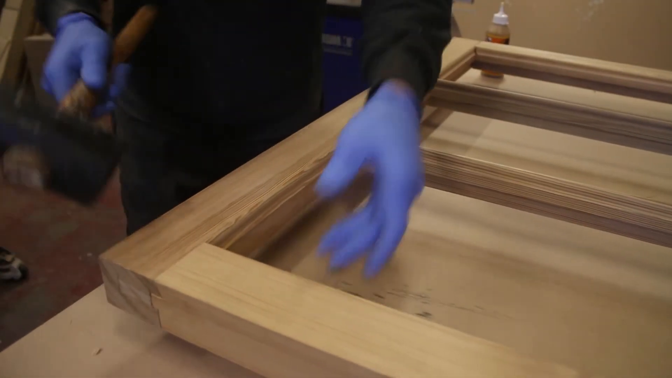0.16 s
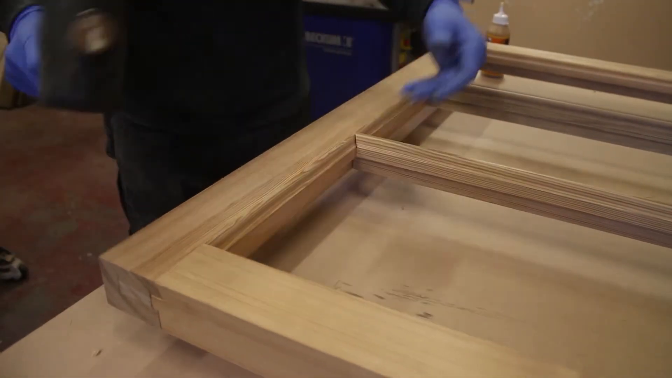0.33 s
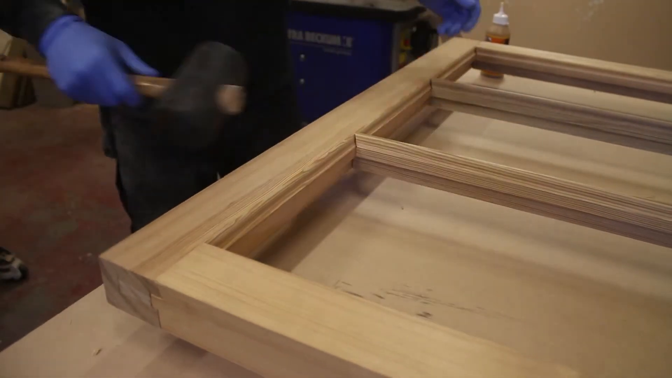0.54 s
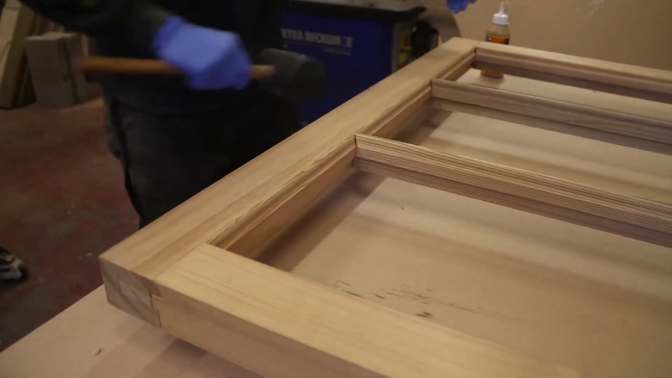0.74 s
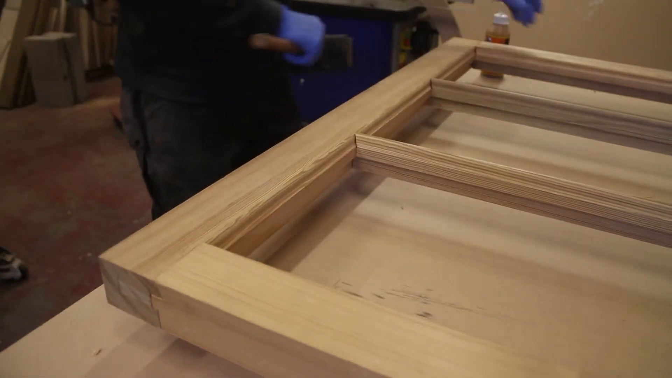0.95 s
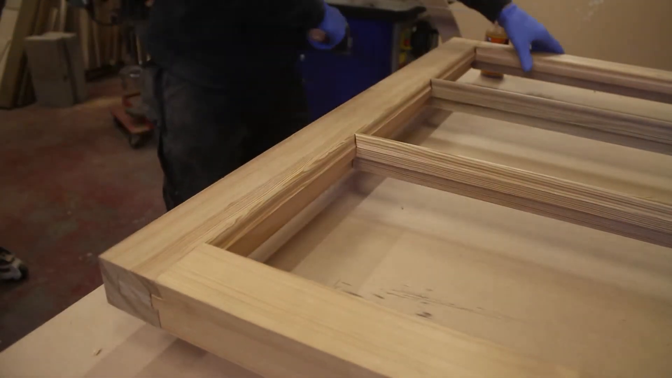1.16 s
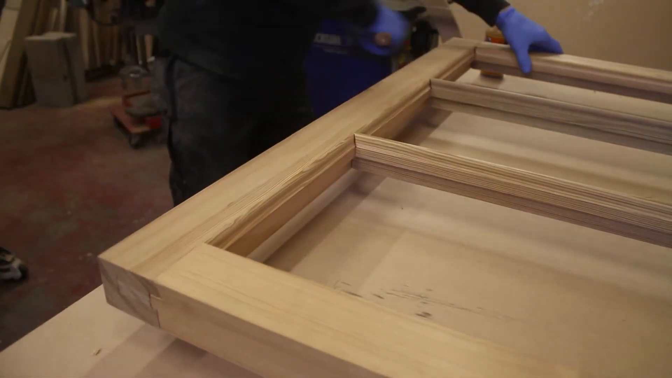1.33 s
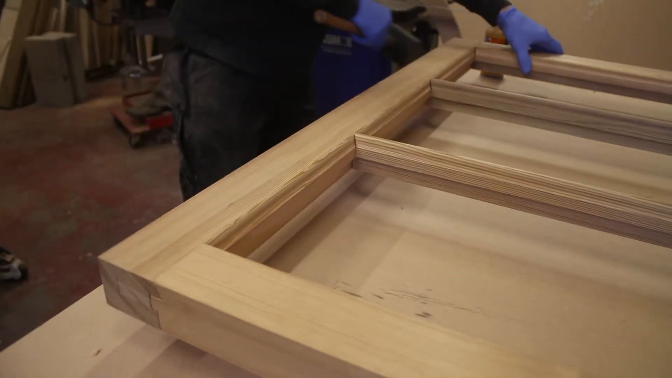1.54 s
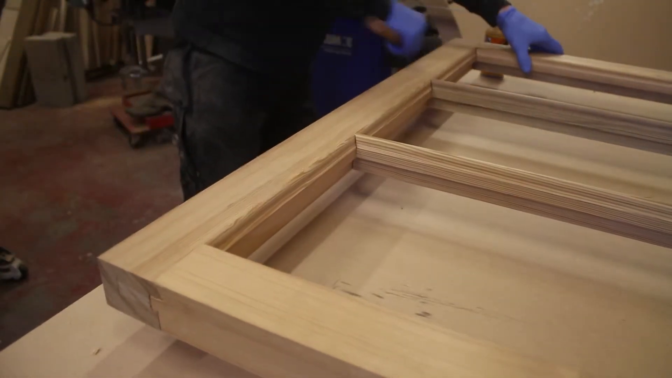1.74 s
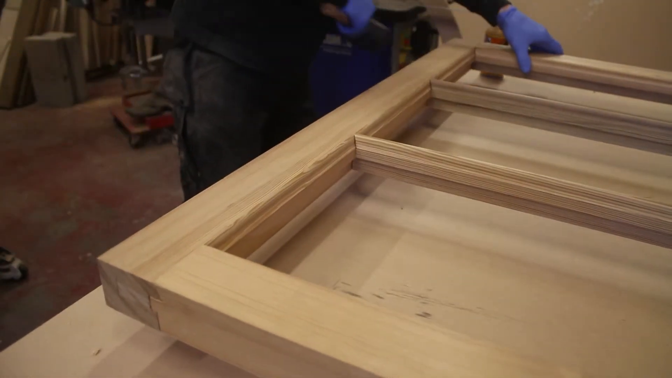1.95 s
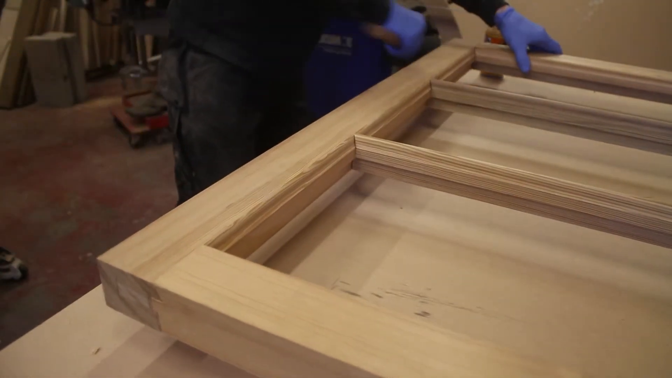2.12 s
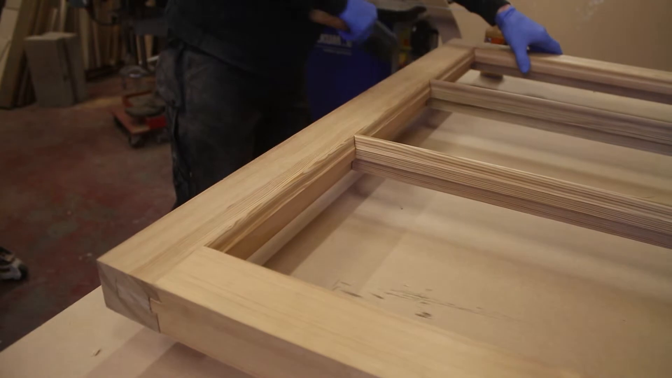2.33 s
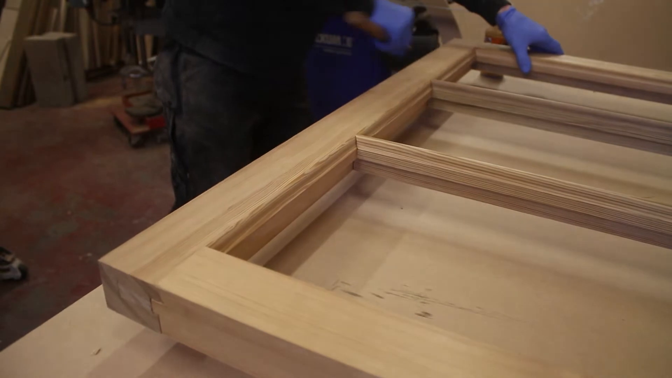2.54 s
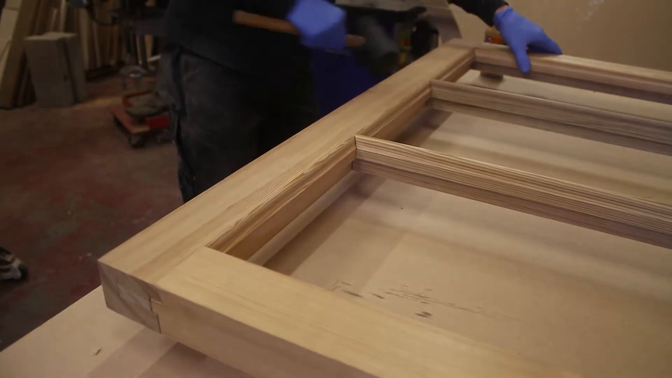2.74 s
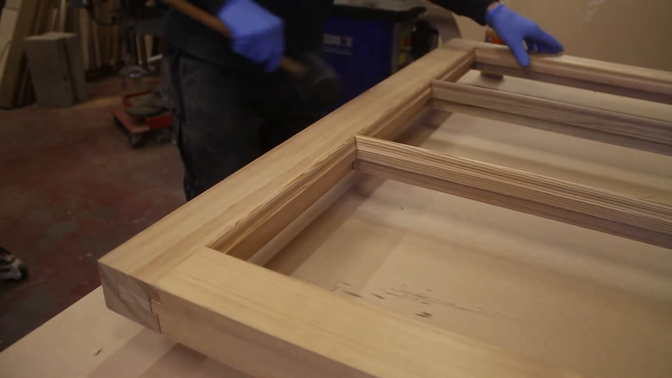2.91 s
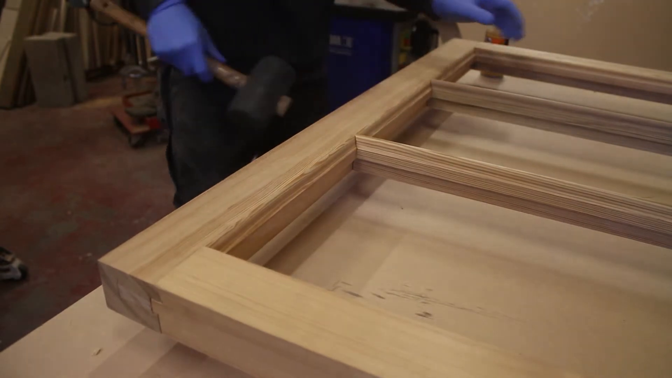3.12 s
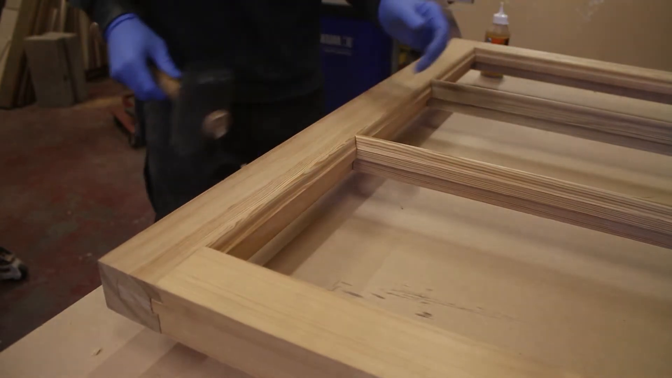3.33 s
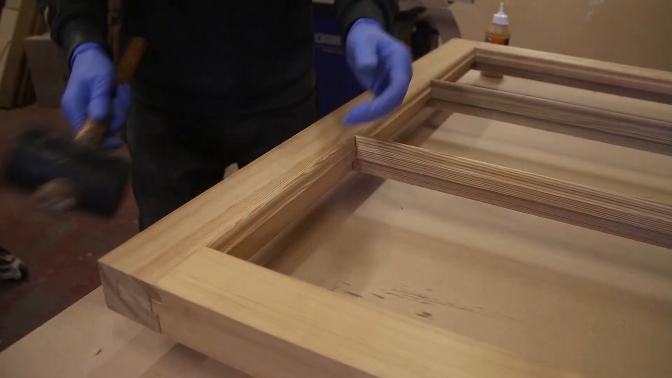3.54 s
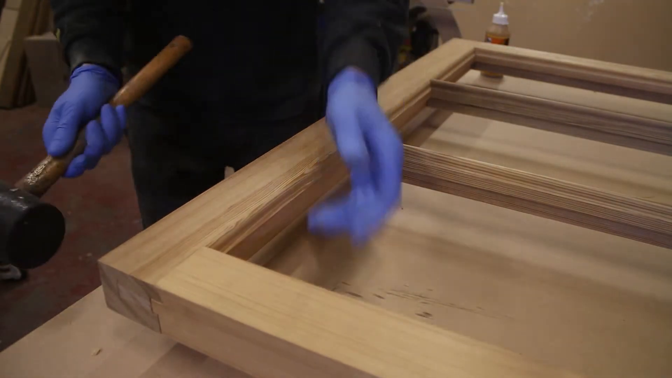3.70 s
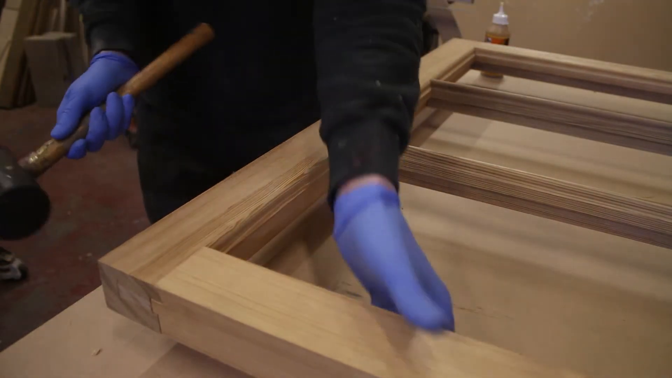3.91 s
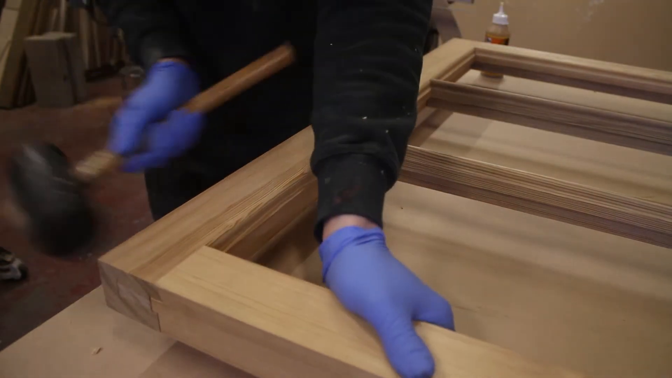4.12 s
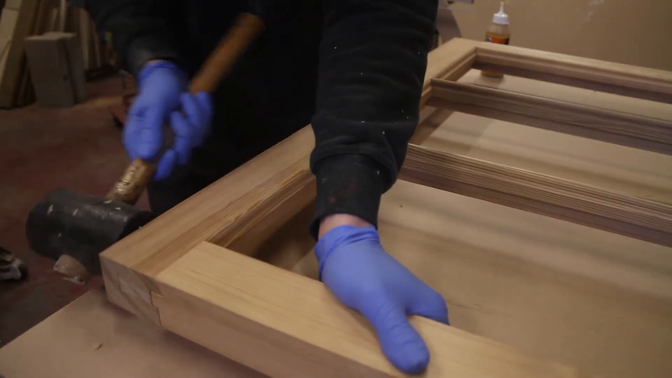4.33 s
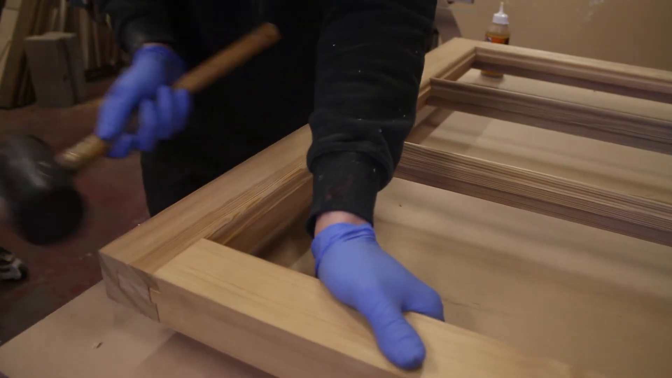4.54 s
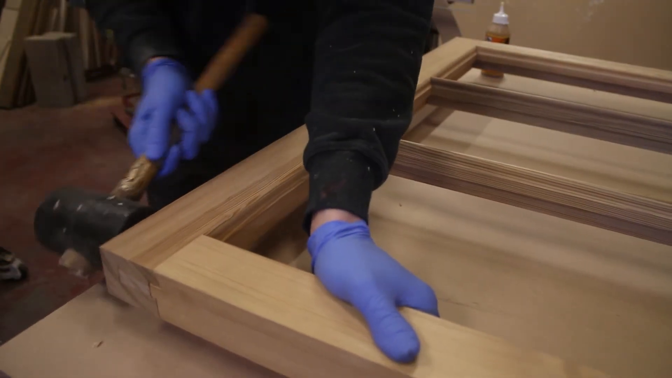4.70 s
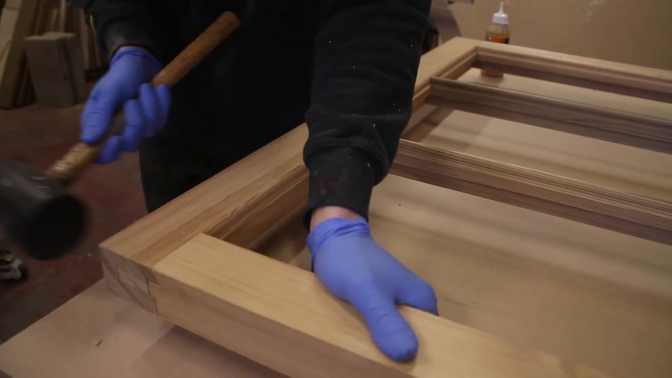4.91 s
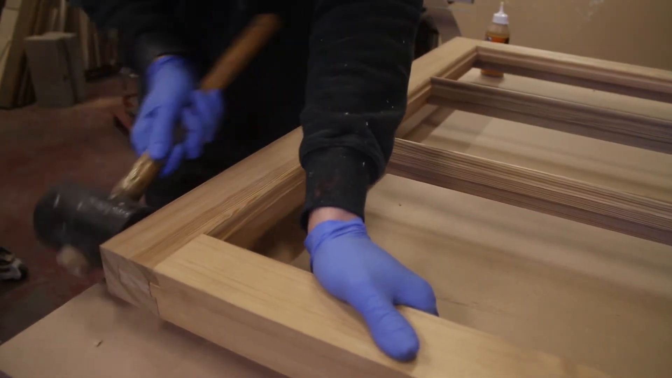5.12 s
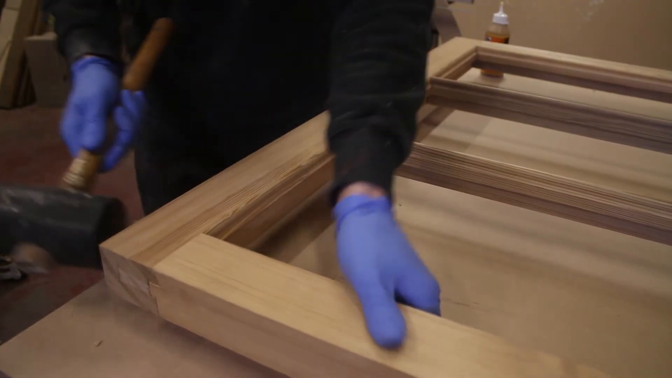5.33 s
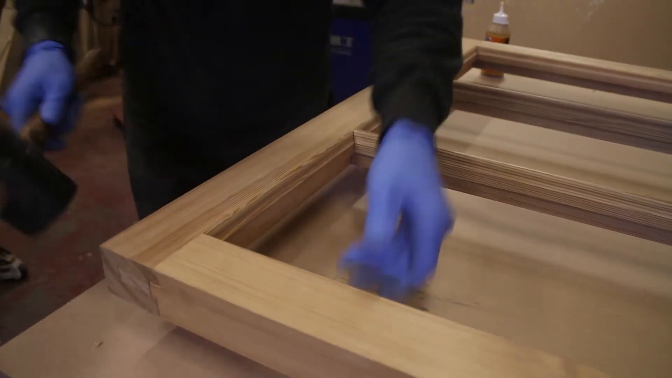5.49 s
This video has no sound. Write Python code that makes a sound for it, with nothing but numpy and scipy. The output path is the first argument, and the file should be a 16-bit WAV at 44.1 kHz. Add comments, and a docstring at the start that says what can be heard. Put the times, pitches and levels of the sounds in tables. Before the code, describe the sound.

A rubber mallet knocks the joints of a wooden frame together: four loud, evenly paced blows, a pause of under two seconds, then three slightly slower ones nearer the microphone. The hits vary between thump and clack, slightly distorted, with the workshop's echo hanging on after each. In between come quiet sleeve and glove rustles, a dull bump and a shoe scuff, over a steady low hum.

```python
"""First comes the fading echo of a mallet blow in a workshop, over a mains hum. A rubber mallet is
driving home the glued joints of a wooden frame on a bench: four blows at the far end, then three at
the near corner, each making the wood ring. Between blows, sleeves and gloves rustle, a shoe scuffs and
a hand bumps the frame. Each blow overloads the microphone, so a limiter (an automatic volume control)
turns the sound down, then back up about as fast as the echo dies, which makes the echo hang on."""
import sys
import numpy as np
from scipy import signal
from scipy.io import wavfile
from scipy.ndimage import minimum_filter1d

SR = 44100
rng = np.random.default_rng(int(sys.argv[2]) if len(sys.argv) > 2 else 0)


def file_out(sig):
    """Save sig as 16-bit WAV at sys.argv[1]."""
    # one column per channel
    cols = np.atleast_2d(sig).T
    # limit, then scale
    lim = np.clip(cols, -1, 1)
    pcm = np.round(lim * 32767).astype(np.int16)
    wavfile.write(sys.argv[1], SR, pcm)


N = 245195
TIME = np.arange(N) / SR

# tone of the workshop's steady air noise: f/Hz, relative level/dB
AIR_COLOUR = [(15, -45), (25, -24), (101, -10.5), (129, -16), (204, -4), (267, -33), (305, -16), (368, -41),
              (399, -1), (433, -22), (495, -20), (2060, -25.5), (2300, -29), (15500, -43.5)]
# tones of the mains hum: f/Hz, level/dB
HUM_TONES = [(50, -66), (100, -57.5), (200, -62.5), (300, -61), (400, -60.5)]
# how much left and right differ in sound that comes from all around: f/Hz, side minus mid level/dB
STEREO_WIDTH = [(60, -5.5), (200, -13), (380, -15.5), (700, -10.5), (1290, -9), (2380, -5), (4400, -5.5),
                (8000, 0), (15000, -0.5)]
# how long the room's echo takes to fade by 60 dB: f/Hz, t/s
ECHO_FADE = [(100, 0.79), (260, 0.57), (700, 0.66), (1150, 0.6357), (1840, 0.615), (4850, 0.6044),
             (8000, .5), (13000, 0.174)]
# tone of the echo: f/Hz, relative level/dB
ECHO_COLOUR = [(50, -9), (150, -1), (350, 0), (700, 0), (1200, 5), (1700, -7.5), (2500, -0.5), (5000, 0.5),
               (9000, 8.5), (12000, 9.5), (16000, -8)]

# rubbing strokes of shoe, sleeve and glove: peak t/s, fade t/s, level/dB
SHOE_STROKES = [(3.764, 0.093, -32)]
SLEEVE_STROKES = [(0.13, 0.24, -44.5), (1.01, 0.095, -50.5), (1.27, 0.062, -47.5), (1.38, 0.13, -45),
                  (3.37, 0.36, -56), (4.093, 0.033, -43.5)]
GLOVE_STROKES = [(0.36, .04, -61), (0.47, 0.064, -58), (2.99, 0.06, -49.5), (3.37, 0.04, -65),
                 (4.033, 0.021, -51), (5.43, 0.052, -46.5)]
# tone of each kind of rubbing: f/Hz, relative level/dB
SHOE_TONE = [(88, -52), (150, -7), (243, -3.5), (306, 2), (425, -2), (477, -9), (636, 0.5), (972, -13),
             (1490, 0), (1770, -1), (2230, -4), (2650, -2), (2920, 0), (15000, -39)]
SLEEVE_TONE = [(200, 1), (900, -1.5), (2000, -1), (3500, 0), (6000, -7), (10000, -20), (15000, -44)]
GLOVE_TONE = [(1000, -2), (3500, -4), (6000, -2), (9000, 3), (12000, -16), (15000, -36)]
# low shudders as the glove grips a rail of the frame: peak t/s, half length t/s, f/Hz, level/dB
GRIP_JUDDERS = [(4.13, 0.021, 165, -40), (4.25, 0.012, 160, -40)]

# modes (natural tones) of frame and bench: f/Hz, width f/Hz, far-end level/dB, near-corner level/dB
WOOD_MODES = [(74.4, 30.5, -3.5, -6.5), (105, 31, -3, -9), (173, 53.5, -2.5, -2.5), (236, 16, 3, 0),
              (271, 43, -2.5, -1), (473, 135.3, 0, -0.5), (524, 29, 3.5, 4), (596, 41, -2.5, -1.5),
              (712, 50, 2, 2), (787.5, 79, -1, -2), (1140, 105, -3.5, -2), (1266, 70.5, -4, -1.5),
              (1420, 218, -6.5, -8), (1871, 158, -4.5, -5), (2304, 386, -10, -8), (3033, 447, -12.5, -9.5),
              (3323, 532, -15, -11), (4210, 1640, -24, -19), (6380, 1670, -26, -23),
              (7520, 4800, -31.5, -27.5), (13200, 25000, -43, -36)]
# mallet blows, the first already fading at the start; each struck spot favours one resonance:
# t/s, force level/dB, end of the frame, joint's give (0 tight, 1 loose), favoured f/Hz, its boost/dB
MALLET_BLOWS = [(-0.135, 50.5, "near", 0.4, 1075, 8), (1.4483, 46.5, "far", 0.77, 4400, 8.5),
                (1.8300, 51, "far", 0.21, 244, 7), (2.2018, 51.5, "far", 0.032, 3340, 2),
                (2.5551, 49.5, "far", 0.27, 676, 3), (4.2625, 49.5, "near", 0.83, 1900, 7.5),
                (4.6871, 51, "near", 0.27, 655, 2.5), (5.1304, 52.5, "near", 0.37, 1160, -1)]


def from_db(db):
    """Turns decibels into a number to multiply by."""
    return 10 ** (np.asarray(db) / 20)


def at_hz(points, hz):
    """Reads between the rows of a table, with every octave equally wide."""
    return np.interp(np.log(hz), np.log(np.array(points)[:, 0]), np.array(points)[:, 1])


def keep_part(x, hz, kind, order):
    """Keeps the lows, the highs or a band; a higher order cuts off the rest more steeply."""
    return signal.sosfilt(signal.butter(order, hz, kind, fs=SR, output="sos"), x)


def shelf(x, hz, gain_db, kind):
    """Turns the lows or the highs up or down."""
    return x + (from_db(gain_db) - 1) * keep_part(x, hz, kind, order=1)


def boost_around(x, hz, gain_db, sharpness):
    """Turns up the sound around one pitch."""
    angle, gain = 2 * np.pi * hz / SR, from_db(gain_db / 2)
    spread, centre = np.sin(angle) / (2 * sharpness), -2 * np.cos(angle)
    forward = [1 + spread * gain, centre, 1 - spread * gain]
    feedback = [1 + spread / gain, centre, 1 - spread / gain]
    return signal.lfilter(forward, feedback, x)


def noise_bands(size):
    """Half-octave bands of stereo noise as (Hz, band); left and right differ most in the treble."""
    edges = np.geomspace(22, 18000, 20)
    white = rng.standard_normal((2, 2, size))
    for k, (low, high) in enumerate(zip(edges, edges[1:])):
        mid, side = keep_part(white[k % 2], [low, high], "band", order=2)
        hz = np.sqrt(low * high)
        yield hz, mid + from_db(at_hz(STEREO_WIDTH, hz)) * np.array([side, -side])


def coloured(bands, colour):
    """Mixes noise bands to a given tone, at an average (rms) level of 1."""
    noise = sum(from_db(at_hz(colour, hz)) * band for hz, band in bands)
    return noise / noise.std()


def background(air_db=-51):
    """The mains hums at 50 Hz and its multiples, over steady air noise."""
    hum = sum(from_db(db) * np.sqrt(2) * np.sin(2 * np.pi * (hz * TIME + rng.random()))
              for hz, db in HUM_TONES)
    return hum + from_db(air_db) * coloured(noise_bands(N), AIR_COLOUR)


def room_echo(echo_db=-37, bench_db=-24.5, bench_fade_s=0.027):
    """A quick spray of reflections off the bench, then the room fading at each band's own rate."""
    t, out = np.arange(SR) / SR, 0
    spray = from_db(bench_db - 60 * t / bench_fade_s)
    for hz, band in noise_bands(SR):
        tail = from_db(echo_db + at_hz(ECHO_COLOUR, hz) - 60 * t / at_hz(ECHO_FADE, hz))
        out = out + band * (tail + spray)
    return out


def bench_bounce(direct, delay_s=0.00177, level_db=-15):
    """The direct sound plus its first bounce off the bench top."""
    t = np.arange(len(direct)) / SR
    return direct + from_db(level_db) * np.interp(t - delay_s, t, direct, left=0)


def add_knock(out, start_s, direct, ringing, room):
    """Adds a direct sound and the ringing wood's echo; the microphone's right side faces away."""
    sound = signal.fftconvolve(room, ringing[None], axes=1)
    duller_right = shelf(direct, hz=7000, gain_db=-18, kind="high")
    sound[:, :len(direct)] += [direct, duller_right]
    at = round(start_s * SR)
    sound = sound[:, max(-at, 0):N - at]
    out[:, max(at, 0):max(at, 0) + sound.shape[1]] += sound


def rubbing(bands, strokes, colour, grain_db, rise_share=0.55):
    """Friction noise swells and fades with each stroke, made uneven by tiny catches."""
    level = 0
    for peak_s, fade_s, db in strokes:
        t = TIME - peak_s
        level += from_db(db) * np.exp(-np.where(t < 0, (t / (rise_share * fade_s)) ** 2, t / fade_s))
    catches = keep_part(rng.standard_normal(N), 250, "low", order=1)
    return level * from_db(grain_db * catches / catches.std()) * coloured(bands, colour)


def glove_judder():
    """Rubber sticks and slips on the wood and shakes it briefly."""
    out = 0
    for peak_s, half_s, hz, db in GRIP_JUDDERS:
        swell = np.exp(-((TIME - peak_s) / half_s) ** 2)
        out += from_db(db) * np.sqrt(2) * swell * np.sin(2 * np.pi * hz * TIME)
    return out


def contact(cutoff_hz):
    """One short push: a softer contact has a lower cutoff and sounds duller."""
    return keep_part(signal.unit_impulse(SR // 4), cutoff_hz, "low", order=2)


def frame_ring(push, near):
    """A push sets the wood's modes ringing briefly; where it lands decides how loud each one is."""
    out = 0
    for k, (hz, width_hz, far_db, near_db) in enumerate(WOOD_MODES):
        decay = np.exp(-np.pi * width_hz / SR)
        feedback = [1, -2 * decay * np.cos(2 * np.pi * hz / SR), decay ** 2]
        mode = (1 - decay ** 2) / 2 * signal.lfilter([1, 0, -1], feedback, push + 1e-18)
        out = out + (-1) ** k * from_db(near_db if near else far_db) * mode
    return out


def hand_bump(out, start_s=3.2133, force_db=12.5, soft_hz=320, echo_boost_db=5.5):
    """A hand bumps the frame; flesh gives way slowly, so it makes a dull thud."""
    push = from_db(force_db) * keep_part(contact(soft_hz), 2 * soft_hz, "low", order=1)
    thud = keep_part(push, 200, "high", order=2)
    add_knock(out, start_s, thud, frame_ring(push, near=False), from_db(echo_boost_db) * room_echo())


def rail_jolt(near, hz=596, fade_s=0.019, far_db=-46, near_db=-40.5):
    """As the mallet stops dead, the rail jumps and sends a few pressure swings at the microphone."""
    t = np.arange(SR // 4) / SR
    level = from_db((near_db if near else far_db) - 60 * t / fade_s)
    swings = -level * np.sin(2 * np.pi * hz * t)
    return keep_part(swings, 440, "high", order=2)   # a narrow rail gives off little bass


def mallet_push(give, favoured_hz, favoured_db):
    """The push of one blow: a loose joint yields with a thump, a tight one answers with a clack."""
    thump_db = np.interp(give, [0, 1], [-5.5, 8])
    clack_db = np.interp(give, [0, 1], [6, -12.5])
    push = shelf(contact(cutoff_hz=10800), 365, thump_db, "low")
    push = shelf(push, 1320, clack_db, "high")
    push = shelf(push, 5500, -clack_db, "high")   # the snap at the very top does not depend on the joint
    return boost_around(push, favoured_hz, favoured_db, sharpness=2.5)


def mallet_blows(direct_db=-9):
    """Each blow rings and jolts the frame at a new spot, with its own pattern of reflections."""
    out = np.zeros((2, N))
    for start_s, force_db, end, give, favoured_hz, favoured_db in MALLET_BLOWS:
        near, force = end == "near", from_db(force_db)
        ringing = force * frame_ring(mallet_push(give, favoured_hz, favoured_db), near)
        direct = bench_bounce(from_db(direct_db) * ringing + force * rail_jolt(near))
        add_knock(out, start_s, direct, ringing, room_echo())
    return out


def scene():
    """The workshop's background, the worker's movements and the mallet, in stereo."""
    bands = list(noise_bands(N))
    shoe = rubbing(bands, SHOE_STROKES, SHOE_TONE, grain_db=0)
    sleeve = rubbing(bands, SLEEVE_STROKES, SLEEVE_TONE, grain_db=-2)
    glove = rubbing(bands, GLOVE_STROKES, GLOVE_TONE, grain_db=4) + glove_judder()
    knocks = mallet_blows()
    hand_bump(knocks)
    return background() + shoe + sleeve + glove + knocks


def limiter(x, threshold_db, attack_s, hold_s, release_db_per_s, start_duck_db):
    """The volume ducks just after a loud peak, waits, and climbs back at a steady rate."""
    peak_db = 20 * np.log10(np.abs(x).max(axis=0) + 1e-9)
    over_db = np.maximum(peak_db - threshold_db, 0)
    half_hold = int(hold_s * SR / 2)
    held_db = -minimum_filter1d(-over_db, 2 * half_hold + 1, origin=half_hold)   # highest recent peak
    held_db[0] = max(held_db[0], start_duck_db)   # still ducked by the first blow
    climb_db = release_db_per_s * TIME
    target_db = np.maximum.accumulate(held_db + climb_db) - climb_db
    lag = np.exp(-1 / (attack_s * SR))
    duck_db, _ = signal.lfilter([1 - lag], [1, -lag], target_db, zi=[target_db[0]])
    return x * from_db(-duck_db)


def record(dry):
    """The front of each blow slips past the limiter and clips; treble above 16 kHz is cut."""
    limited = limiter(dry, threshold_db=-2, attack_s=0.002, hold_s=0.032,
                      release_db_per_s=115.5, start_duck_db=10.5)
    clipped = 0.95 * np.clip(limited, -1, 1)
    return signal.sosfilt(signal.ellip(10, 0.1, 80, 16000, fs=SR, output="sos"), clipped)


dry = scene()
out = record(dry)
file_out(out)
```